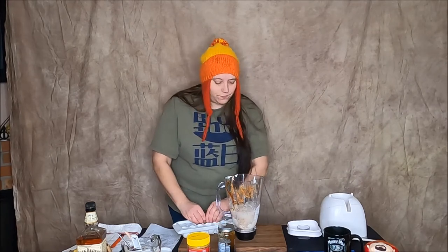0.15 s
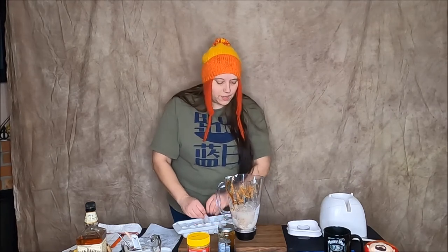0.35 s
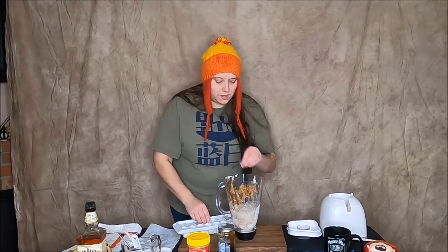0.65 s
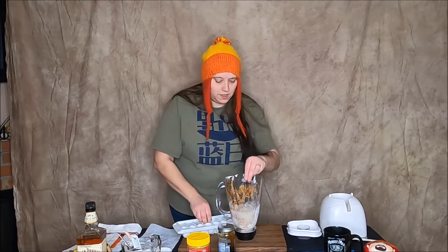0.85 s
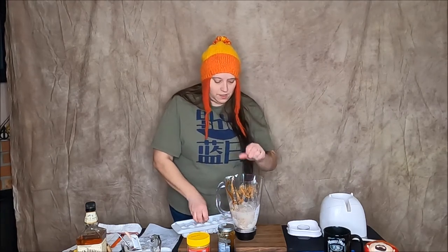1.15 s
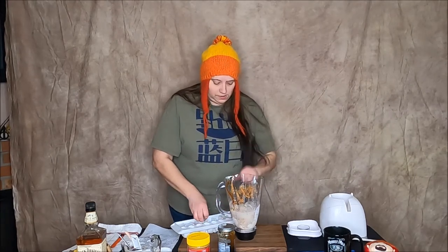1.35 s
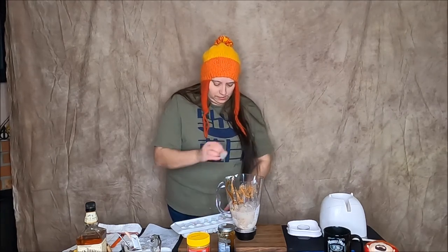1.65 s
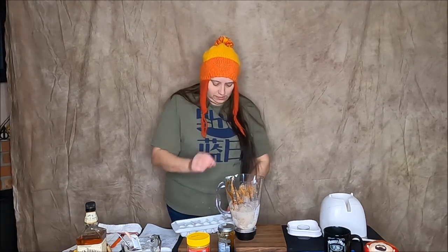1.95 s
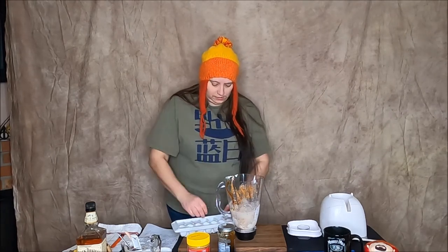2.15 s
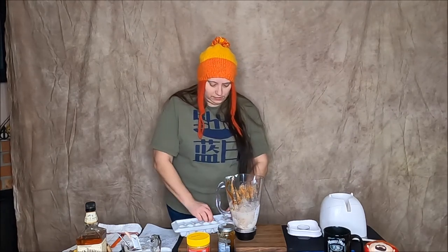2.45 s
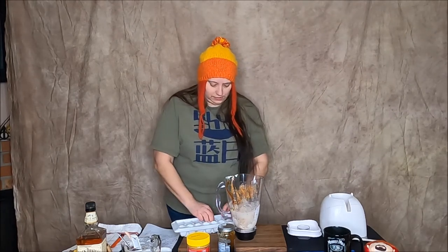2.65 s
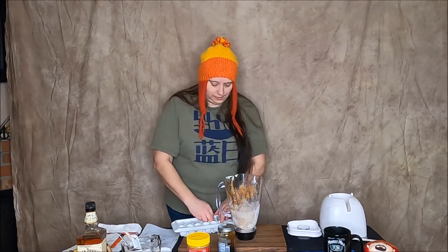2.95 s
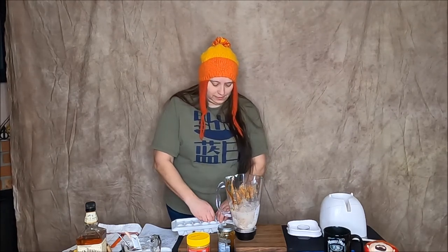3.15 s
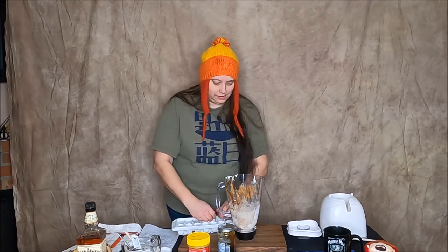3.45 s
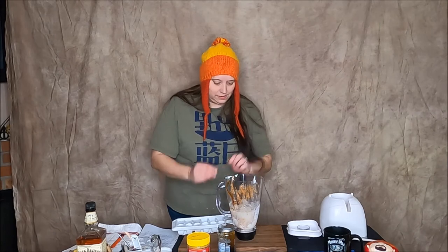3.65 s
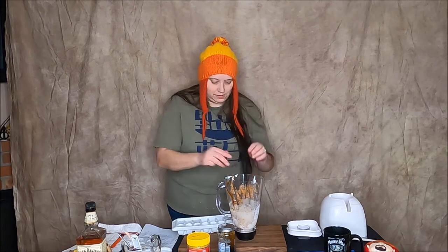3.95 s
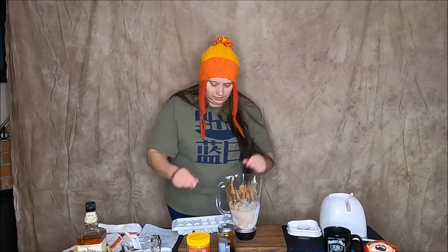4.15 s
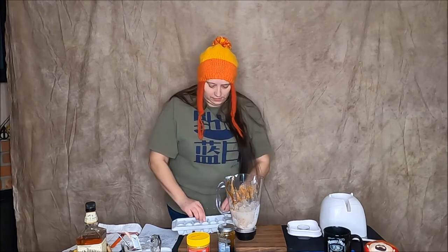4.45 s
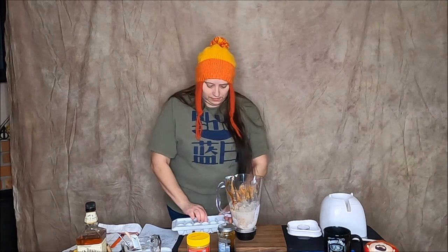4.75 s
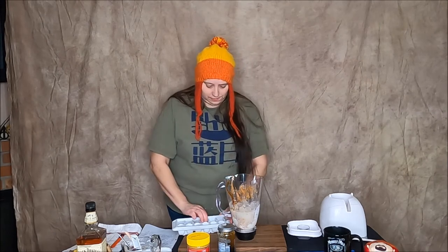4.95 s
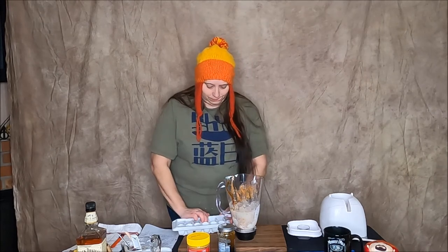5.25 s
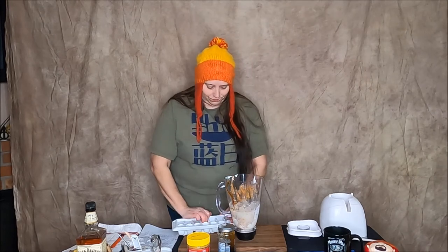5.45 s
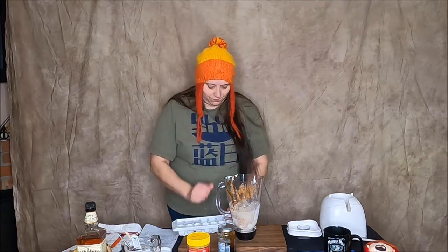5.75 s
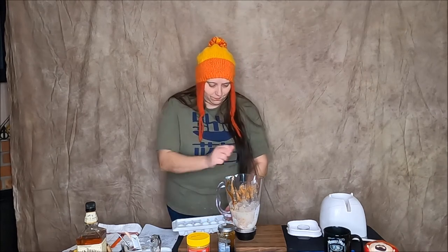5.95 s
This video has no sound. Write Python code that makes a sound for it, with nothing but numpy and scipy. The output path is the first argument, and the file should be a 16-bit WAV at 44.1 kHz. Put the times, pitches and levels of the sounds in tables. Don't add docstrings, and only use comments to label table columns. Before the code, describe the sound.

Brittle plastic-and-ice crackles and snaps, three hollow clunks of cubes landing in a jar, then a loud hard twist in a small quiet room.

```python
import sys
import numpy as np
from scipy import signal
from scipy.fft import rfft, irfft
from scipy.io import wavfile
from scipy.ndimage import uniform_filter1d

SR = 44100
rng = np.random.default_rng(int(sys.argv[2]) if len(sys.argv) > 2 else 0)


def gain_from_db(level_db):
    decades = np.asarray(level_db, float) / 20
    return 10 ** decades


def dump_mix(stems):
    frames = np.atleast_2d(stems).T
    limited = np.clip(frames, -1, 1)
    pcm = np.round(limited * 32767).astype(np.int16)
    wavfile.write(sys.argv[1], SR, pcm)


N = 268569


def evened(x):
    return x / np.sqrt(np.mean(x ** 2) + 1e-20)


def read(points, hz):
    f, value = np.transpose(points)
    return np.interp(np.log(hz + 1), np.log(f + 1), value)


def add(mix, s, sound):
    part = mix[round(s * SR):][:len(sound)]
    part += sound[:len(part)]


def loudest_rms(x, size):
    return np.sqrt(uniform_filter1d(x ** 2, size=size).max())


def ring(hz, db, t60, phase, seconds, rise_s):
    t = np.arange(round(seconds * SR))[:, None] / SR
    modes = gain_from_db(db - 60 * t / t60) * np.sin(2 * np.pi * (hz * t + phase))
    x = modes.sum(axis=1) * (1 - np.exp(-t[:, 0] / rise_s))
    return x / loudest_rms(x, 176)


def blows(rows, modes, rise_s, shift=.027, spread_db=5.0):
    out = np.zeros(N)
    hz, db, t60 = np.transpose(modes)
    for (s, peak_db), chance in zip(rows, rng.random((len(rows), 3, len(modes)))):
        mode_hz = hz * (1 + shift * (chance[0] - .5))
        mode_db = db + spread_db * chance[1]
        add(out, s, gain_from_db(peak_db) * ring(mode_hz, mode_db, t60, chance[2], t60.max(), rise_s))
    return out


def tray_colour(low_db, high_db, ring_hz, ring_db, ring_width, spot):
    # (frequency [Hz], level [dB per Hz])
    shell = [(400, -24), (770, -16), (950, -3), (1300, -4.5), (1900, -4.5), (2600, -6.5), (3600, -8.5),
             (5000, -10), (6200, -13.5), (7200, -14), (8800, -14.5), (10800, -23.5), (14900, -36.5),
             (17000, -49.5)]
    hz = abs(np.fft.fftfreq(1024, 1 / SR))
    tilt = [(1300, low_db), (2300, 0.0039), (5300, 0.032), (6600, high_db)]
    db = read(shell, hz) + read(tilt, hz)
    db += ring_db * np.exp(-(np.log((hz + 1) / ring_hz) / ring_width) ** 2)
    db += read(np.transpose([np.geomspace(800, 15000, len(spot)), spot]), hz)
    log_spectrum = np.conj(signal.hilbert(np.log(gain_from_db(db.clip(-90, 40)))))
    kernel = np.fft.ifft(np.exp(log_spectrum)).real[:512]
    return kernel / np.linalg.norm(kernel)


def floor():
    # (frequency [Hz], level [dB per Hz])
    spectrum = [(12, -2), (27, 3), (36, 2), (80, -1.5), (120, -4), (200, -8.5), (330, -19.5), (390, -15.5),
                (600, -26), (1300, -30), (3000, -41.5), (6000, -45.5), (10000, -61), (16000, -65.5)]
    # (frequency [Hz], left-right likeness [0-1])
    likeness = [(60, 0.8), (240, 0.64), (950, 0.22), (3770, 0.13), (15000, 0.2)]
    floor_db = -56.5
    hz = np.fft.rfftfreq(4096, 1 / SR)
    a, b, c, d, patches = rng.standard_normal((N // 1024 + 5, 2049, 5)).T
    patches = uniform_filter1d(patches, size=20, axis=0)
    patches = evened(uniform_filter1d(patches, size=5, axis=1))
    same = read(likeness, hz)[:, None]
    left, other = a + 1j * b, c + 1j * d
    z = np.array([left, same * left + np.sqrt(1 - same ** 2) * other])
    z *= gain_from_db(read(spectrum, hz)[:, None] + 2.6 * patches)
    noise = signal.istft(z, nperseg=4096, noverlap=3072)[1][:, :N]
    return gain_from_db(floor_db) * evened(noise)


def hum():
    # (time [s], level [dB])
    swell = [(0.0, -44.5), (0.42, -48), (0.52, -43), (0.83, -48.5), (1.39, -46.5), (1.71, -49),
             (1.9, -44.5), (2.05, -49.5), (2.39, -45), (2.591, -48), (2.76, -45), (3.09, -48), (3.21, -46),
             (4.26, -46), (4.36, -47), (4.6, -43), (5.019, -46), (6.09, -47.5)]
    shaft_hz, second_db = 58.8, -27.5
    s, db = np.transpose(swell)
    t = np.arange(N) / SR
    turn = 2 * np.pi * shaft_hz * t + 1.1 * np.sin(2 * np.pi * 0.36 * t)
    orders = np.sin(turn) + gain_from_db(second_db) * np.sin(2 * turn)
    return np.sqrt(2) * gain_from_db(np.interp(t, s, db)) * orders * gain_from_db(1) ** 0 * gain_from_db([[.45], [-.45]])


def room(x):
    # (frequency [Hz], t60 [s])
    decay = [(300, 0.45), (800, 0.19), (2000, 0.16), (5500, 0.17), (12000, 0.13)]
    out = np.zeros((2, N))
    places = np.arange(120, SR // 2 - 20, 20)
    for k in range(3):
        taps = np.zeros((2, SR // 2))
        at = places + rng.integers(0, 20, (2, len(places)))
        np.put_along_axis(taps, at, rng.choice([-1., 1.], at.shape), 1)
        hz, t, z = signal.stft(taps, SR, nperseg=256)
        same = read([(500, 0.9), (2000, 0.55), (6000, 0.036), (12000, 0.17)], hz)[:, None]
        z[1] = same * z[0] + np.sqrt(1 - same ** 2) * z[1]
        tail = signal.istft(z * gain_from_db(-60 * t / read(decay, hz)[:, None]), SR, nperseg=256)[1]
        tail /= np.linalg.norm(tail[0])
        share = np.sqrt(2 / 3) * np.cos(np.pi * (np.arange(N) / SR * 7 + k / 3))
        out += signal.fftconvolve((share * x)[None], tail, axes=1)[:, :N]
    return out


def table():
    # (time [s], peak level [dB])
    thuds = [
        (0.535, -48),
        (0.605, -42.5),
        (1.3, -56.5),
        (3.239, -53.5),
        (4.564, -50),
        (5.065, -43),
        (5.096, -50.5),
        (5.386, -48.5),
    ]
    # (frequency [Hz], level [dB], t60 [s])
    modes = [(130.4, -1.5, 0.11), (174.4, 1.5, 0.13), (245, 3, 0.062), (319, -13, 0.29), (358, -6.5, 0.09)]
    return blows(thuds, modes, 0.0036)


def jar():
    # (time [s], peak level [dB], thump share [dB])
    knocks = [(1.076, -36, -24), (1.092, -35.5, -36), (1.213, -53, -0.5), (1.272, -42.5, -5.5),
              (1.385, -46, -18), (1.418, -50, -9), (2.014, -32, -16), (2.029, -28, -11),
              (2.048, -29.5, -16.5), (2.139, -53, -13), (2.175, -53, -15.5), (2.231, -49, -25),
              (4.071, -35, -3), (4.095, -25.5, -14), (4.124, -30, -17), (4.214, -35.5, -34),
              (4.248, -43, -15), (4.272, -56, 4), (5.392, -42, -31)]
    # (time [s], peak level [dB])
    bumps = [
        (0.525, -52),
        (0.612, -47),
        (5.215, -47),
        (5.29, -48.5),
        (5.53, -62),
    ]
    # (frequency [Hz], level [dB], t60 [s])
    wall_modes = [(556, -9, 0.06), (580, -5, 0.042), (640, -12.5, 0.099), (700, -7, 0.054),
                  (745, -11.5, 0.065), (803, -10, 0.12), (913, -13, 0.05), (940, -19.5, 0.056),
                  (1015, -5.5, 0.04)]
    # (frequency [Hz], level [dB], t60 [s])
    thump_modes = [(132, 0, 0.085), (198, 6, 0.056), (252, 6, 0.12), (294, -4.5, 0.1), (349, -21, 0.13),
                   (402, 6, 0.049)]
    # (frequency [Hz], level [dB], t60 [s])
    rim_modes = [(685, 3, 0.34), (1560, 7, 1.0), (1770, 13, 0.8), (2480, 3, 1), (2750, -1.5, 1)]
    # (time [s], peak level [dB])
    rim_blows = [
        (2.02, -49.5),
        (4.2, -62.5),
    ]
    hits = [(s, db) for s, db, share_db in knocks]
    thumps = [(s, db + share_db) for s, db, share_db in knocks]
    walls = blows(hits, wall_modes, 0.00035, shift=0.0045, spread_db=2.5)
    walls += blows(bumps, wall_modes + thump_modes[5:], 0.0025)
    rattled = evened(uniform_filter1d(rng.standard_normal(N), size=130))
    return walls + blows(thumps, thump_modes, 0.0028) + rattled * blows(rim_blows, rim_modes, 0.014)


def booms():
    # (time [s], level [dB], held [s], frequency [Hz])
    air_tones = [(1.078, -32.5, 0.033, 555), (1.12, -43, 0.015, 562), (1.195, -54, 0.036, 565),
                 (1.385, -52, .04, 565), (2.042, -27.5, 0.025, 562), (2.098, -47, 0.056, 553),
                 (2.175, -58, 0.036, 551), (2.22, -56.5, .02, 610), (4.068, -36, .015, 640),
                 (4.095, -28, 0.02, 591), (4.119, -26, 0.015, 584), (4.15, -45, 0.059, 585),
                 (4.212, -44.5, 0.036, 558.6), (4.255, -49, .035, 580)]
    rise_s, smother_t60_s = .003, 0.056
    out, t = np.zeros(N), np.arange(SR // 8) / SR
    for s, db, held, hz in air_tones:
        smothered_db = 60 * (t - held).clip(0) / smother_t60_s
        shape = (1 - np.exp(-t / rise_s)) * gain_from_db(db - smothered_db - 125 * t)
        add(out, s, np.sqrt(2) * shape * np.sin(2 * np.pi * hz * t))
    return out


def pressure():
    # (time of full pressure [s], held [s], level [dB])
    strokes = [(0.0, 0.19, -51), (0.2, 0.21, -58.5), (0.42, 0.13, -49.5), (0.58, 0.043, -40),
               (0.761, 0.3, -59), (1.03, 0.041, -45.5), (1.277, 0.055, -43), (1.96, .05, -65.5),
               (2.08, 0.072, -64.5), (2.62, 0.024, -44), (2.778, 0.084, -48), (2.97, 0.32, -51),
               (3.38, 0.42, -57), (3.899, 0.27, -85), (4.2, 0.045, -58.5), (4.61, 0.076, -67),
               (4.689, 0.33, -62.5), (5.1, 0.068, -44.5), (5.3, 0.26, -49.5), (5.54, 0.11, -51.5),
               (5.66, 0.034, -71), (5.95, 0.15, -74)]
    press_db_per_s, lift_db_per_s, rest_db = 328, 157.5, -85.5
    t = np.arange(0, N + 64, 64) / SR
    force = gain_from_db(rest_db) + np.zeros(len(t))
    for s, held, db in strokes:
        pressing = press_db_per_s * (s - t).clip(0)
        lifting = lift_db_per_s * (t - s - held).clip(0)
        force += gain_from_db(db - pressing - lifting)
    return np.interp(np.arange(N) / SR, t, force)


def rubs():
    slips = np.zeros(N)
    for hz, spot in zip(np.geomspace(950, 5500, num=8), rng.random((8, 26)) - .5):
        slow = evened(uniform_filter1d(rng.standard_normal(N // 100 + 1), size=8))
        clumps = gain_from_db(7.66 * np.repeat(slow, 100)[:N])
        size = gain_from_db(7.4 * np.minimum(rng.exponential(1, N), 1.9))
        size *= (rng.random(N) < 350 / SR) * rng.choice([-1, 1], N)
        colour = tray_colour(0.46, -0.45, hz, ring_db=12, ring_width=.13, spot=11 * spot)
        slips += signal.oaconvolve(size * clumps, colour)[:N]
    return pressure() * evened(slips)


def ticks():
    # (time [s], peak level [dB], ring
    # frequency [Hz])
    hard_ticks = [(0.0014, -33, 5400), (0.05, -46, 5190), (0.216, -28, 3440), (0.2337, -30.5, 1720),
                  (0.3798, -24.5, 1440), (0.4673, -27, 4540), (0.4956, -42, 3250), (0.5213, -30.5, 1300),
                  (0.545, -24, 3180), (0.5775, -21, 2400), (0.75, -32, 1720), (0.7556, -34.5, 2000),
                  (0.77, -34, 1380), (0.8095, -41, 1660), (0.819, -40.5, 2370), (0.8865, -24, 1100),
                  (0.898, -35, 1230), (0.99, -39, 3290), (1.051, -29, 1960), (1.0672, -25, 1810),
                  (1.1055, -24, 1770), (1.165, -31, 4180), (1.1833, -34.5, 1770), (1.4257, -29, 3270),
                  (1.5103, -41, 4670), (2.0121, -16, 2640), (2.1182, -29, 3270), (2.2363, -40.5, 1080),
                  (2.491, -16, 5810), (2.539, -12.5, 8500), (2.6292, -19.5, 3040), (2.7608, -25.5, 4130),
                  (2.8873, -29, 5230), (2.968, -25, 4460), (2.985, -25.5, 4310), (3.0137, -27.5, 2250),
                  (3.2318, -20, 2140), (3.398, -31, 1470), (3.4557, -30.5, 5330), (3.5464, -28, 1420),
                  (3.6073, -44, 1610), (3.6273, -38.5, 4030), (3.754, -34, 1170), (3.8159, -37, 1330),
                  (4.1976, -25, 920), (4.2173, -29, 2040), (4.2673, -38, 900), (4.2782, -30.5, 4570),
                  (4.7011, -31.5, 1330), (4.9137, -12, 3080), (5.0277, -36, 2860), (5.122, -16.5, 1040),
                  (5.1464, -28, 1060), (5.2585, -47, 2860), (5.374, -37, 2500), (5.52, -19, 3670),
                  (5.5679, -28, 2800), (5.637, -25.5, 2730), (5.8449, -53, 4980), (5.9704, -39, 5600),
                  (0.185, -23, 3400), (0.3996, -17.5, 4730), (0.516, -39.5, 8600), (0.588, -22, 4800),
                   (0.6065, -29, 8500), (0.856, -26.5, 1100), (1.136, -22, 4600), (2.137, -49.5, 8500),
                   (2.174, -44.5, 6000), (3.139, -27, 8000), (4.365, -49, 4600), (4.447, -56, 4600),
                   (4.775, -28, 4900), (4.884, -44, 4500), (4.895, -39.5, 6000), (5.0955, -9.5, 2520),
                   (5.383, -21, 4500), (5.393, -15, 2970), (5.506, -19, 4840), (5.733, -35, 8500),
                   (5.763, -41, 8900), (5.839, -41, 8500), (5.868, -48, 7200), (5.68, -38, 9000),
                   (2.465, -47, 4470), (4.05, -46, 3000)]
    out = np.zeros(N)
    for s, db, hz in hard_ticks:
        snap = tray_colour(-4.5, -6.0, hz, ring_db=16.5, ring_width=.17, spot=np.zeros(2))
        add(out, s, gain_from_db(db - 6.0) * snap / loudest_rms(snap, 30))
    return out


def breaks():
    # (time [s], peak level [dB], strongest ring [Hz], high share [dB])
    first_pry = [(0.043, -39, 1430, -5), (0.106, -38.5, 1620, -5), (0.134, -30.5, 1550, -23),
                 (0.167, -30, 1740, -17), (0.185, -23, 1440, -12.5), (0.278, -39.5, 1080, -26),
                 (0.377, -25, 1260, -28), (0.4, -15.5, 1160, -16.5), (0.466, -30.5, 3000, -20),
                 (0.519, -24.5, 1190, -23.5), (0.541, -29, 3040, -15), (0.563, -28.5, 1210, -37),
                 (0.576, -23, 2360, -38), (0.59, -17.5, 1070, -15.5), (0.613, -8, 2500, -18.5),
                 (0.734, -34, 1110, -17), (0.751, -31, 970, -19), (0.817, -55, 2450, -15),
                 (0.834, -33, 1410, -17), (0.858, -24, 1040, -27), (0.901, -27.5, 950, -30.5),
                 (0.998, -31.5, 1860, -21.5), (1.075, -16, 1080, -15.5), (1.134, -22.5, 4400, -18),
                 (1.189, -29.5, 3340, -20), (1.272, -23, 1370, -15.5), (1.345, -25, 3120, -40),
                 (1.382, -35, 2480, -25), (1.409, -29.5, 3240, -20.5), (1.486, -38, 1020, -20.5)]
    # (time [s], peak level [dB], strongest ring [Hz], high share [dB])
    second_pry = [(2.477, -19, 1080, -10.5), (2.616, -25, 3220, -28), (2.655, -23.5, 4350, -22),
                  (2.759, -27.5, 2280, -18), (2.812, -30, 5000, -9), (2.921, -38, 4400, -8.5),
                  (2.96, -32, 4530, -23.5), (3.01, -23.5, 1390, -25), (3.094, -41, 2320, -42.5),
                  (3.136, -33.5, 1230, -8), (3.17, -34, 1000, -6), (3.231, -29.5, 2140, -14),
                  (3.322, -28.5, 1120, -15), (3.37, -32, 1420, -15), (3.454, -35.5, 5300, -16),
                  (3.506, -41, 1371, -14.5), (3.543, -35.5, 1680, -33), (3.569, -34.5, 2240, -13.5),
                  (3.657, -35.5, 1634, -3), (3.681, -25.5, 4360, -11), (3.799, -38.5, 1120, -42.5)]
    # (time [s], peak level [dB], strongest ring [Hz], high share [dB])
    third_pry = [(4.671, -35.5, 1800, -18), (4.682, -31.5, 4600, -14.5), (4.705, -37.5, 1160, -18),
                 (4.776, -26.5, 2610, -10.5), (4.901, -23.5, 4500, -11.5), (4.914, -15.5, 3600, -17.5),
                 (5.02, -38.5, 4030, -39), (5.052, -10, 4500, -13), (5.066, -8.5, 2660, -9.5),
                 (5.094, -8, 964, -19), (5.24, -35.5, 1450, -13), (5.279, -15.5, 2730, -20.5),
                 (5.324, -14.5, 2720, -19), (5.386, -11.5, 1880, -17.5), (5.482, -25.5, 2670, -16),
                 (5.513, -20, 3800, -11), (5.601, -31, 2390, -26), (5.634, -29, 2620, -38),
                 (5.712, -34.5, 1240, -16)]
    # (time [s], peak level [dB], strongest ring [Hz], high share [dB])
    clatter = [(2.012, -15.5, 1670, -20), (2.025, -19.5, 1620, -25), (2.042, -19.5, 940, -22),
               (2.117, -38.5, 3040, -25), (4.071, -15.5, 957, -14.5), (4.082, -16.5, 960, -13.5),
               (4.102, -16.5, 980, -25), (4.139, -27, 1005, -26), (4.206, -35.5, 2480, -47),
               (4.213, -26.5, 1650, -45), (4.226, -37, 1010, -34), (4.274, -35, 5400, -19)]
    # (time [s], peak level [dB], strongest ring [Hz], high share [dB])
    crunch = [(0.371, -34.5, 1370, -13), (0.415, -43, 1160, -42.5), (0.431, -32.5, 980, -26.5),
              (0.629, -42, 2260, -28.5), (0.653, -27.5, 1400, -15.5), (1.089, -20, 1680, -33),
              (1.103, -40.5, 1770, -26), (1.284, -24, 1190, -13), (1.423, -36.5, 2650, -40),
              (2.493, -19, 1050, -19), (2.511, -23.5, 1010, -19.5), (2.529, -20.5, 2480, -34.5),
              (2.538, -21, 1080, -12.5), (2.554, -25.5, 2770, -38), (2.63, -29, 1180, -14),
              (2.841, -34.5, 1660, -9.5), (3.047, -35.5, 1330, -20), (3.31, -31, 1400, -22),
              (3.338, -34.5, 1540, -14), (3.389, -30.5, 1080, -20.5), (5.056, -9, 5030, -18.5),
              (5.074, -11, 825, -40), (5.106, -30, 950, -6), (5.122, -19, 1040, -16),
              (5.149, -24.5, 1400, -13), (5.273, -24.5, 1010, -36), (5.391, -14.5, 3550, -19),
              (5.417, -29.5, 1410, -5), (5.55, -30, 3250, -6), (5.679, -34, 1160, -18)]
    # (time [s], peak level [dB], strongest ring [Hz])
    slides = [
        (1.913, -58.5, 5100),
        (5.775, -56, 4840),
        (5.8265, -48, 5000),
        (5.839, -39.5, 5100),
        (5.865, -60.5, 4880),
        (5.937, -51.5, 4950),
        (5.966, -53, 4560),
        (6.067, -56, 4500),
    ]
    # (time [s], peak level [dB], strongest ring [Hz], high share [dB])
    taps = [
        (4.564, -38.5, 950, -14.5),
        (4.585, -53, 1200, -34),
        (5.218, -32, 1020, -28),
    ]
    slide_high_db, low_db_per_octave = -0.5, -5.5
    slides = [(s, db, hz, slide_high_db) for s, db, hz in slides]
    # rows, dying time [ms], ring [dB], low share for a ring at 1 kHz [dB]
    kinds = [(first_pry + second_pry + third_pry, 4.1, 7.5, -6),
             (clatter, 5, 12, -14.5),
             (crunch, 5.5, 11, -10.5),
             (slides, 7, 24.5, -22),
             (taps, 3.5, 7.3, 4.2)]
    out = []
    for rows, ms, ring_db, low_db in kinds:
        for s, db, hz, high_db in rows:
            low = low_db + low_db_per_octave * np.log2(hz / 1000)
            out.append((s, db, hz, low, high_db, ms, ring_db))
    return out


def cracks():
    rows, lead = breaks(), 300
    t = (np.arange(4000) - lead) / SR
    after = t.clip(0)
    near, sent = np.zeros(N), np.zeros(N)
    draws = rng.random((len(rows), 3, 4000))
    sizes = np.cos(2 * np.pi * draws[:, 0]) * gain_from_db(7.25 * np.minimum(-np.log(draws[:, 1]), 4.5))
    spots = draws[:, 2, :26] - .5
    for (s, db, hz, low_db, high_db, ms, ring_db), size, spot in zip(rows, sizes, spots):
        life = np.clip(ms, .6, 25) / 1000
        run = (1 - np.exp(-after / (0.37 * life))) * np.exp(-after / life)
        run *= 1 + 2.2 * np.exp(-after / 0.00078)
        creep = 0.17 * np.exp(t.clip(None, 0) / 0.0021) * (t < 0)
        tear = evened(size) * (run + creep)
        tear[lead + 8] += 0.0021 / life
        colour = tray_colour(low_db + 9.0, high_db + 14.5, hz, ring_db, ring_width=0.12, spot=10.0 * spot)
        sound = signal.fftconvolve(tear, colour)
        sound *= gain_from_db(db - 8.0) / loudest_rms(sound, 176)
        add(near, s - lead / SR, sound)
        room_colour = tray_colour(low_db + 10.0, high_db + 14, hz, 0.79 * ring_db, ring_width=0.16,
                                  spot=7.4 * spot)
        add(sent, s + .6 * life, np.linalg.norm(sound) * room_colour)
    return near, sent


def ports(near):
    # (frequency [Hz], left minus right [dB])
    balance = [(60, -3.5), (150, 0), (380, -0.5), (950, -0.5), (2380, 2), (5980, 1), (15000, -4)]
    hz = np.fft.rfftfreq(N, 1 / SR)
    late = np.exp(-2j * np.pi * hz * 1.0 / SR)
    lean = gain_from_db(read(balance, hz) / 2)
    return irfft(rfft(near) * np.array([late * lean, 1 / lean]), N)


def scene():
    snaps, snaps_sent = cracks()
    scrapes, knocks = ticks() + rubs(), jar()
    work = scrapes + 0.72 * knocks + table()
    direct = gain_from_db(-5.0) * (snaps + work + 0.44 * knocks + booms())
    reverberant = gain_from_db(-5.5) * room(snaps_sent + work)
    return ports(direct + reverberant) + hum() + floor()


def low_pass(x):
    return signal.sosfilt(signal.butter(12, 15990, fs=SR, output="sos"), x)


def record(dry):
    return low_pass(dry)


dry = scene()
out = record(dry)
dump_mix(out)
```